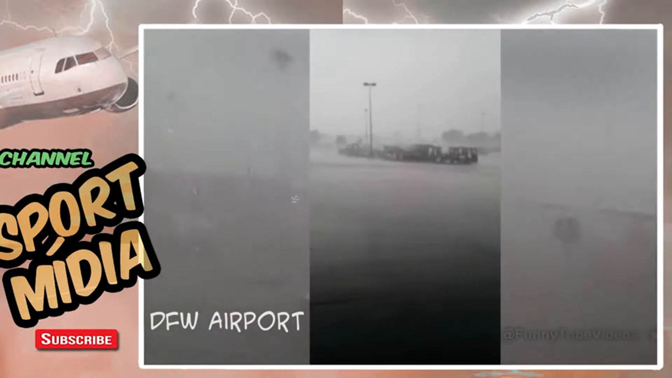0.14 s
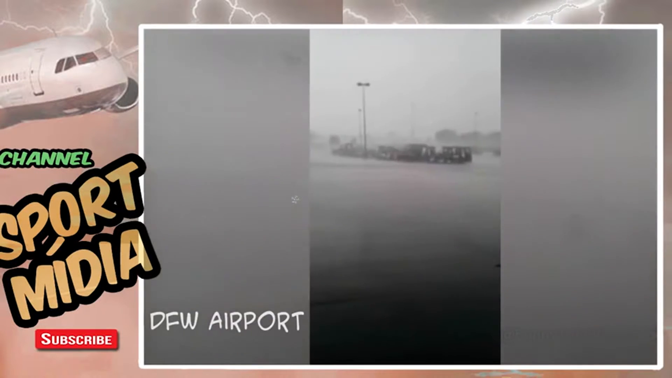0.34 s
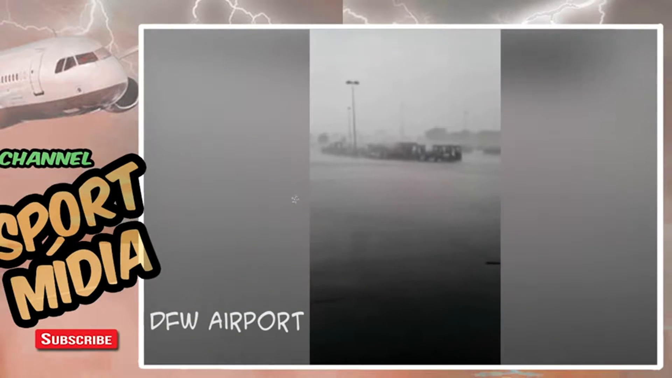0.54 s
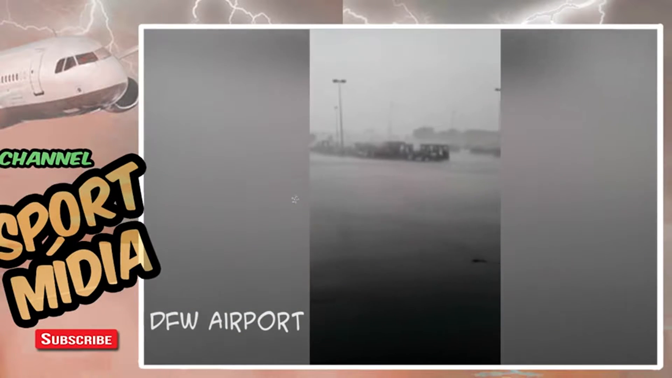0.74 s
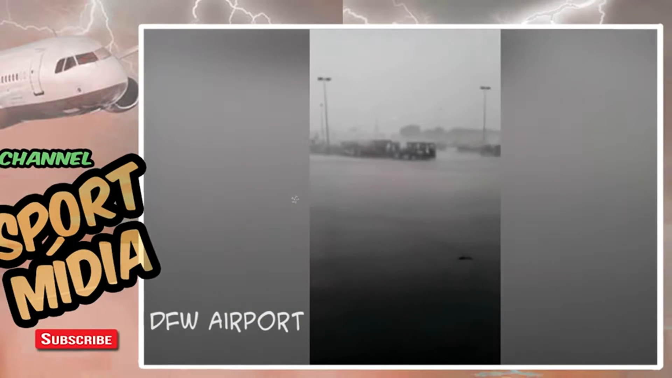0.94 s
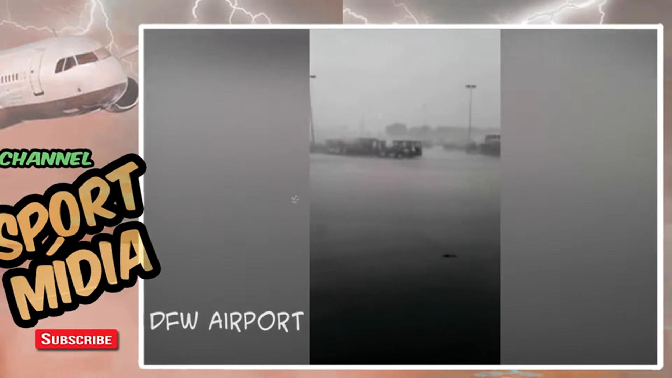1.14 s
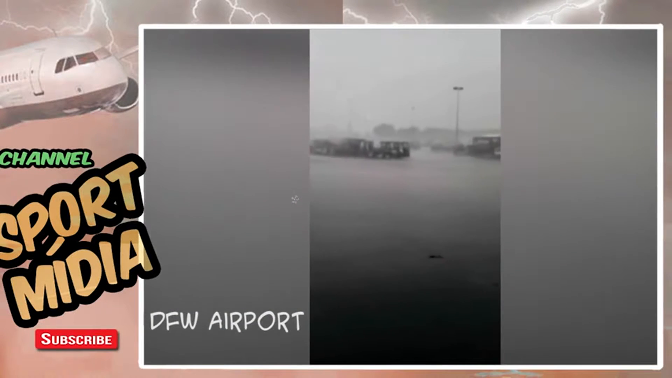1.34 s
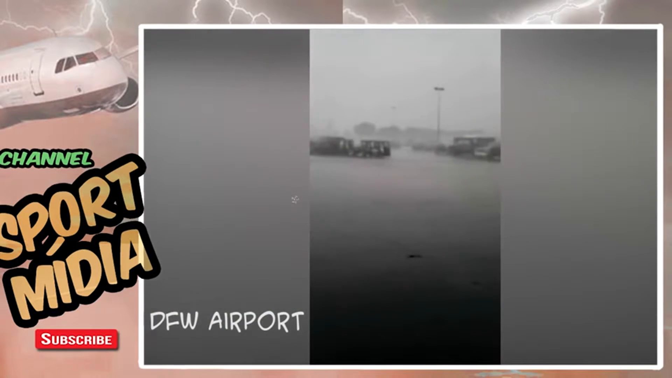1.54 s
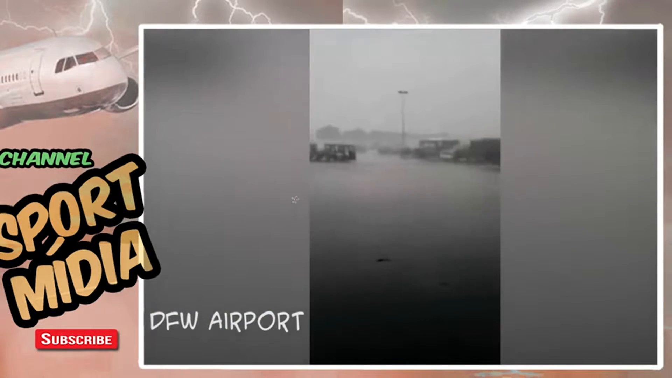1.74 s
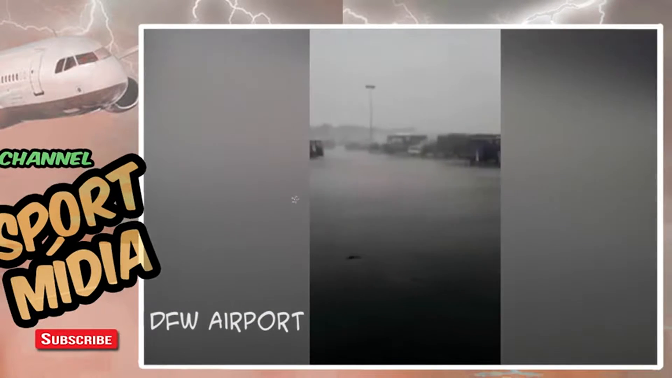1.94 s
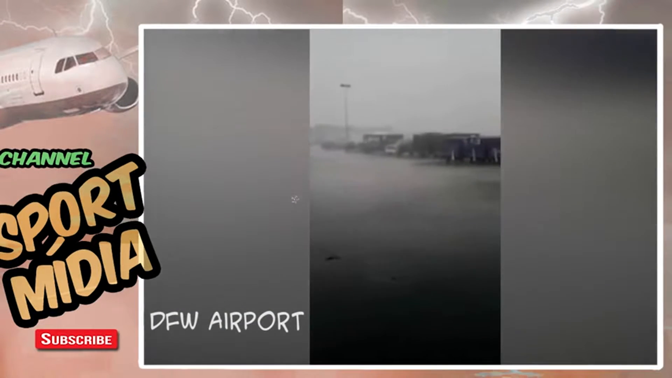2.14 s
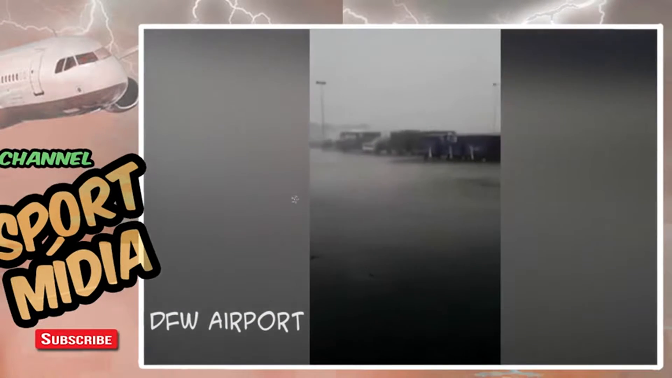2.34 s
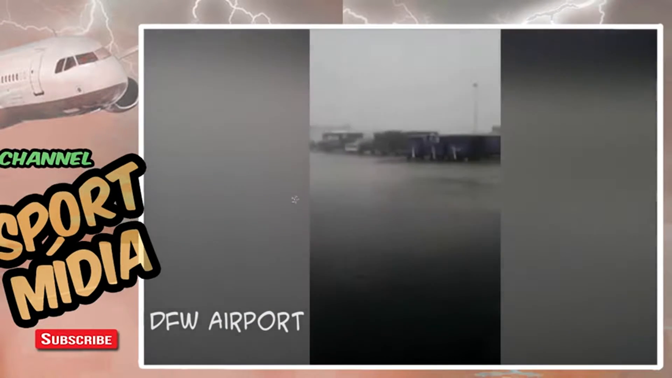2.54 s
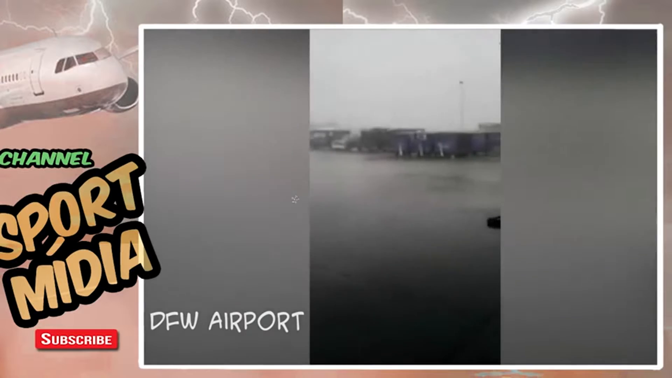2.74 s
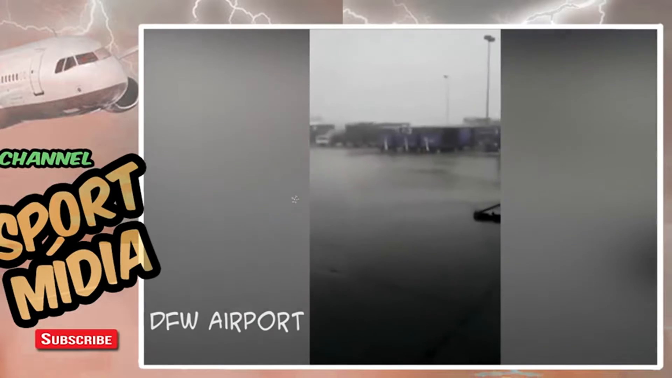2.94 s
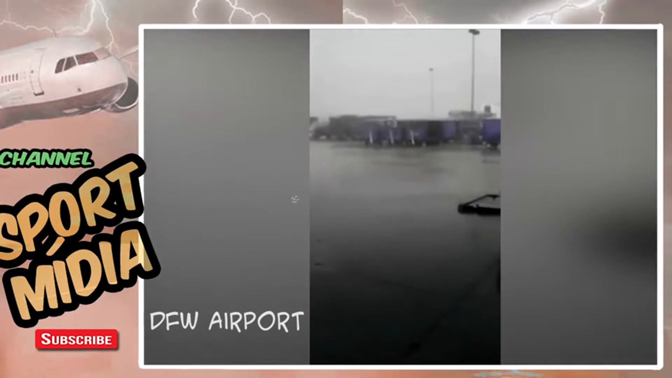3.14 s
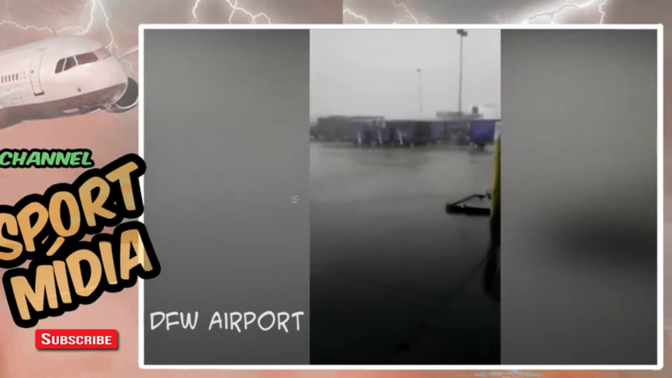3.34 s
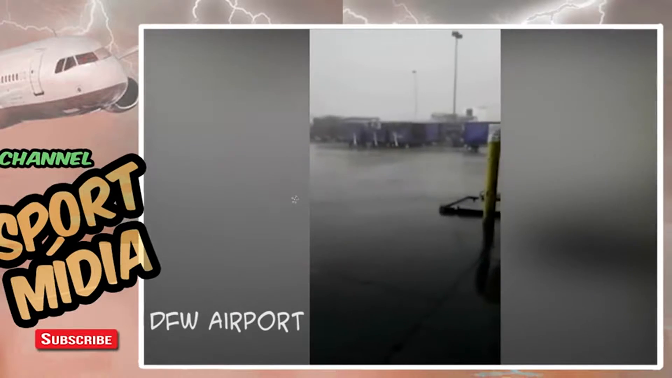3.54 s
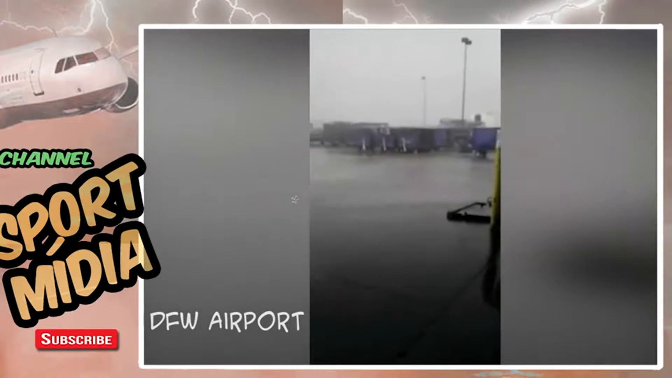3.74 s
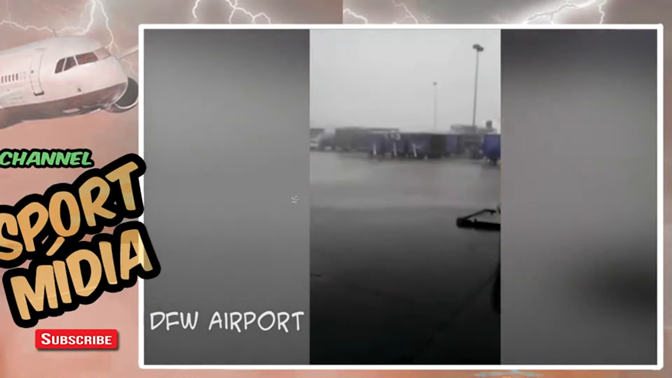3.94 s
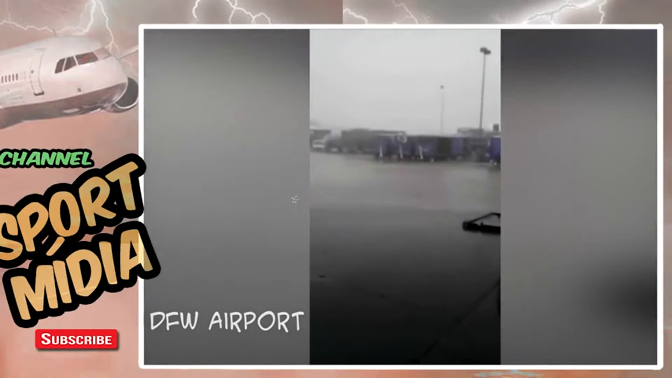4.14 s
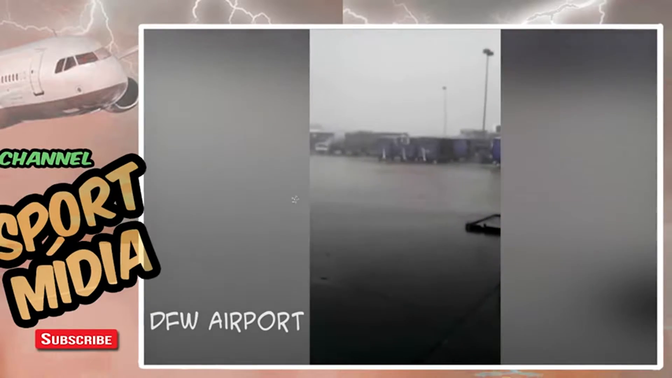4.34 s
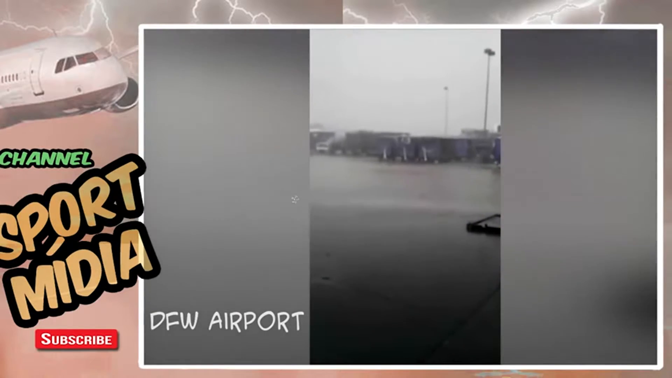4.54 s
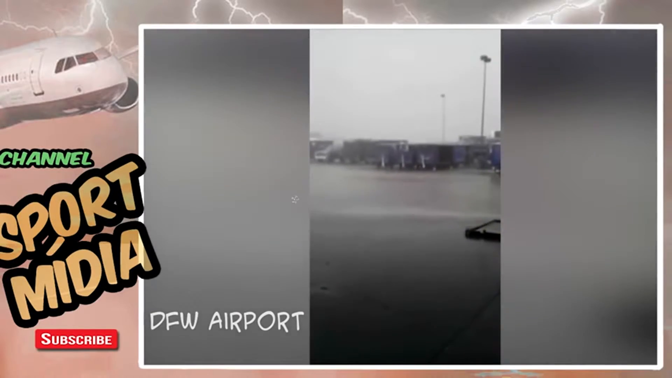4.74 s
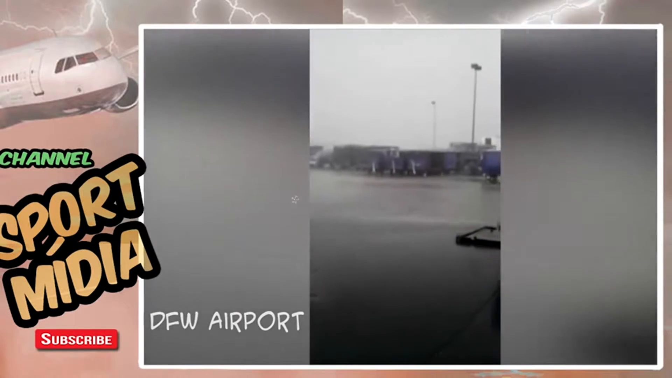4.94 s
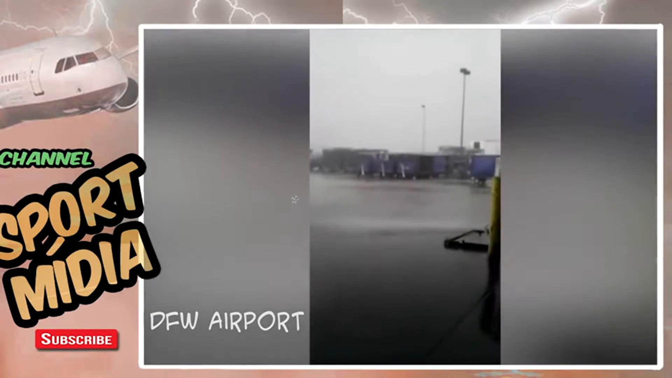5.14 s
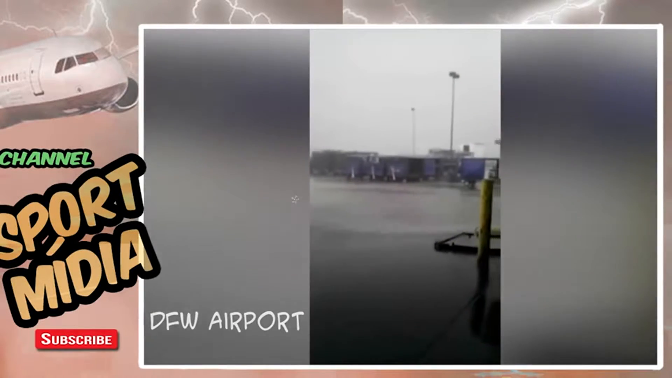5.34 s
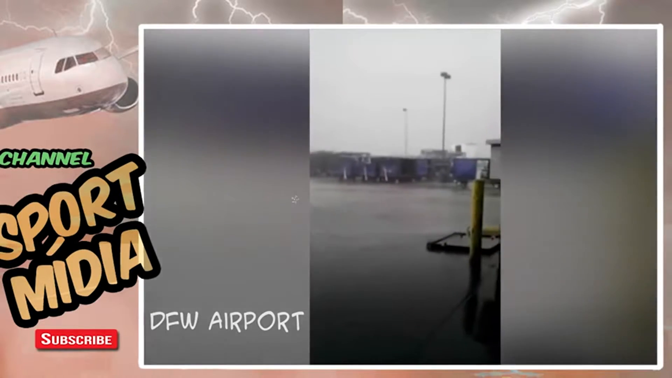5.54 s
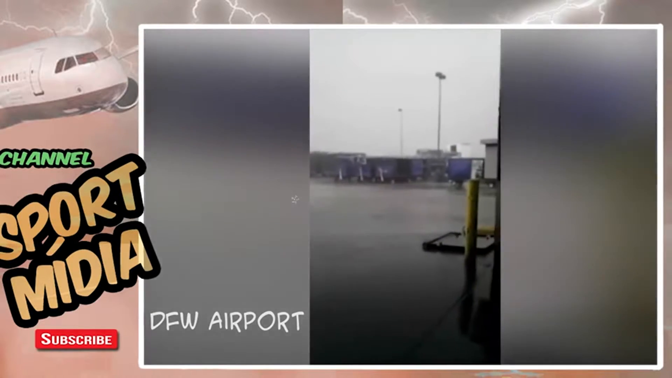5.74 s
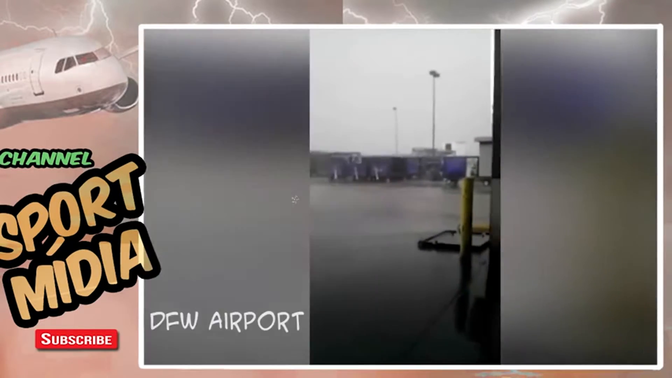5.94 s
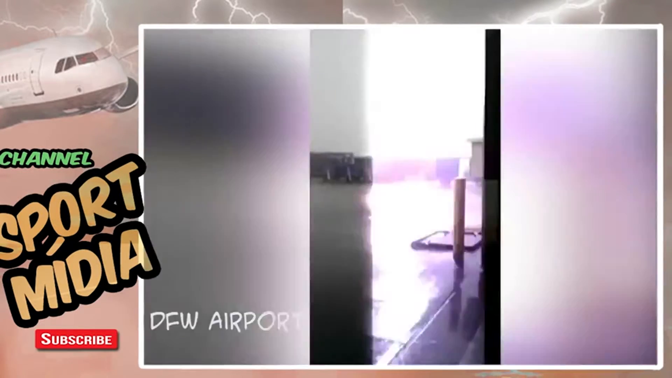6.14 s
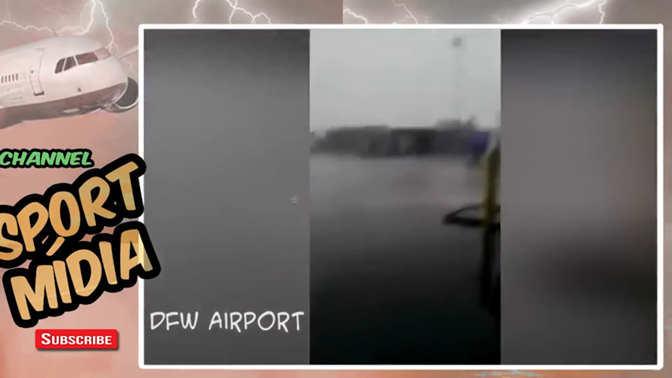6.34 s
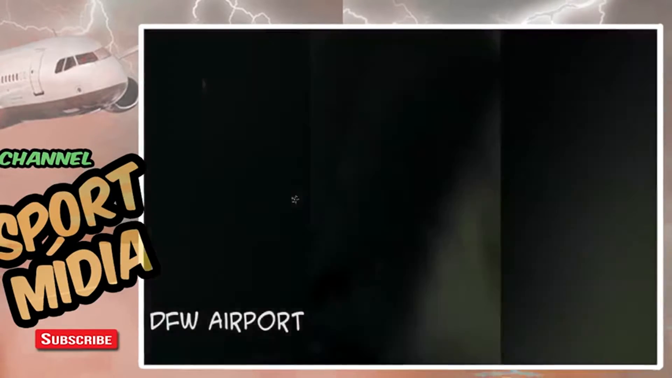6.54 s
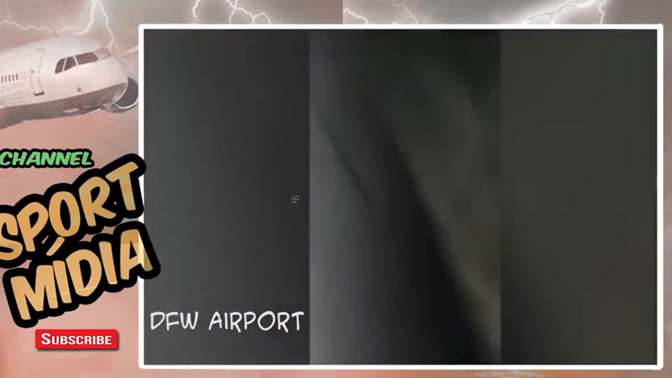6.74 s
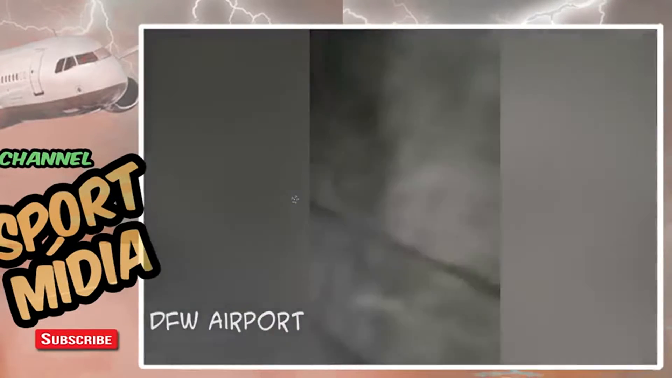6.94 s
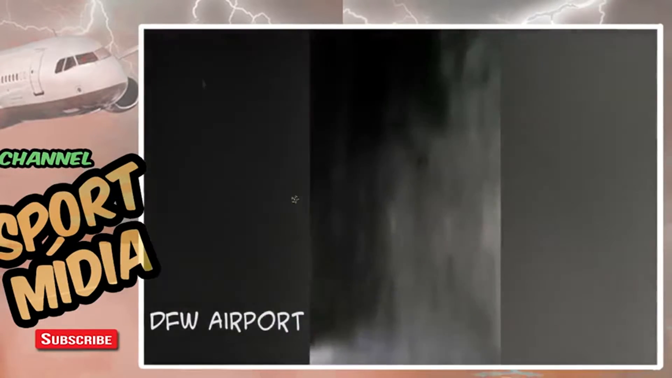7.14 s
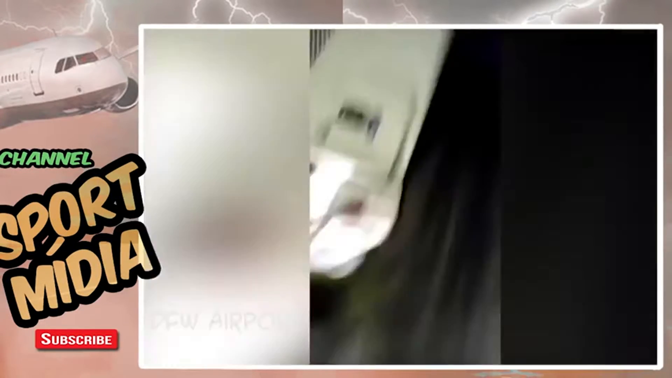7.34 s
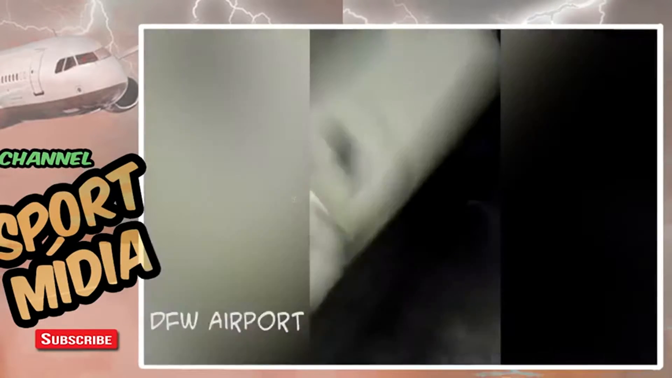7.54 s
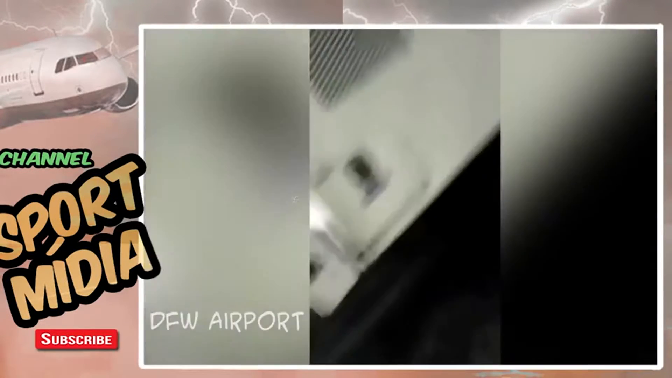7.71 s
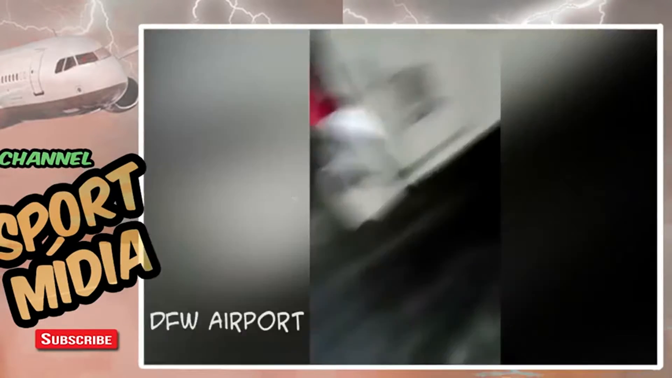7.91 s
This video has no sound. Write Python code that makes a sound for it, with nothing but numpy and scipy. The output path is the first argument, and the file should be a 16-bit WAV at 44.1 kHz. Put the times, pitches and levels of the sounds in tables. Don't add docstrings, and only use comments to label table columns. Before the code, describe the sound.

Steady rain hisses under gusts that buffet the microphone, then very close lightning cracks violently and an overloaded boom rolls away into dull thunder.

```python
import sys
import numpy as np
from scipy import signal
from scipy.fft import rfft, irfft, next_fast_len
from scipy.io import wavfile
from scipy.ndimage import uniform_filter1d

SR = 44100
rng = np.random.default_rng(int(sys.argv[2]) if len(sys.argv) > 2 else 0)


def gain_from_decibels(decibels):
    exponent = np.asarray(decibels, float) / 20
    return 10 ** exponent


def transcribe(u):
    v = np.clip(np.atleast_2d(u).T, -1, 1)
    q = np.round(v * 32767).astype(np.int16)
    wavfile.write(sys.argv[1], SR, q)


N = 355970
T = np.arange(N) / SR
SLOW = T[::32]
CUT_S = 0.06


# [onset t/s, peak level/dB, decay t60/s]
CRACKS = [
    (6.112, -14.5, 0.13),
    (6.1345, -4, 0.073),
    (6.146, 6, 0.043),
    (6.151, 1.5, 0.035),
    (6.161, -8, 0.32),
    (6.188, 0, 0.051),
    (6.2, 1, .06),
    (6.213, 0, 0.16),
    (6.8277, -5, .08),
]
# [f/Hz, level/dB per Hz]
CRACK_COLOUR = [(60, -65), (130, -30), (300, -2.5), (1200, -10.5), (2300, -11.5), (3200, -5), (4200, -9.5),
                (6300, -5.5), (8500, -9.5), (12400, -18), (14000, -27)]


def cracks():
    t = T[::8]
    shape = 0
    for s, db, t60 in CRACKS:
        decay = gain_from_decibels(db - 60 * np.maximum(t - s, 0) / t60)
        shape = shape + decay * np.clip((t - s) / 0.0034, 0, 1)
    shocks = patter(rate=4100, spread_db=-1.0, share=0.3)
    tear = unit(irfft(colour(shocks, CRACK_COLOUR)[0])[:N])
    return gain_from_decibels(-6.5) * np.interp(T, t, shape) * tear


# [t/s, level/dB, extra distance of the part of the channel heard/m]
ROLL = [
    (6.232, 6.5, 0),
    (6.32, 6, 2),
    (6.45, 2, 10),
    (6.81, -5.5, 1.5),
    (6.85, -1, 0),
    (7.15, -3.5, 31),
    (7.4, -4, 124),
    (7.6, -6, 182),
    (8.07, -6, 297),
]
# [f/Hz, level/dB per Hz]
ROLL_COLOUR = [(18, -63), (30, -39), (117, -9), (222, -1), (371, -3.5), (411, -8.5), (467, -6), (722, -9),
               (982, -12.5), (1090, -11.5), (3360, -19.5), (8470, -19), (13800, -23)]
# [peak t/s, level/dB, rise/s, fall/s], rise and fall over 10 dB
BOOMS = [
    (6.25, 5, .3, 0.53),
    (6.6, -2, .3, 0.27),
    (6.81, 0, 0.27, 0.022),
    (6.99, -7, 0.11, 0.062),
    (7.25, -11.5, 0.15, 0.31),
    (7.7, -21, 0.59, 0.61),
    (8.02, -11, 0.36, .2),
]
# [peak t/s, level/dB, rise/s, fall/s]
RIPS = [
    (6.3, -1, 0.071, 0.045),
    (6.65, 2, 0.091, 0.19),
    (6.85, -5, 0.039, 0.085),
]
# [f/Hz where booms are full, f/Hz where they vanish]
BOOM_TOP_HZ = [260, 940]
# [f/Hz where rips begin, f/Hz where they are full]
RIP_FROM_HZ = [570, 22000]
# [f/Hz, loss/dB per 100 m]
TREBLE_LOSS = [(950, 0), (3000, 2), (6900, 4), (8200, 7), (9700, 20), (11500, 21), (13800, 41)]


def roll():
    strike_s = 6.226
    level_db, metres = curve(ROLL)
    boom_db, rip = swells(BOOMS, -25), gain_from_decibels(swells(RIPS, -35))
    lumps = walk(rate=18)
    out, size = np.zeros(N), 2 * SR
    shocks = patter(rate=1500, spread_db=1.5, share=0.26, size=size)
    for hz, band in bands(shocks, ROLL_COLOUR, count=4):
        low, high = along(hz, BOOM_TOP_HZ, [1, 0]), along(hz, RIP_FROM_HZ, [0, 1])
        boom_weight = along(hz, [90, 220], [1.3, 1]) * low
        body = gain_from_decibels(boom_weight * boom_db + (1 - low) * level_db - 2.4 * high)
        loss_db = along(hz, *np.transpose(TREBLE_LOSS)) * metres / 100
        band_db = 20 * np.log10(body + 0.53 * high * rip)
        band_db = band_db + 0.4 * lumps + 0.9 * walk(rate=25) - loss_db
        out[-size:] += band * gain_of(band_db)[-size:]
    return out * gain_from_decibels(-8.0) * np.clip((T - strike_s) / 0.0019, 0, 1)


# [t/s, level/dB, spray blown past the shelter/dB]
RAIN = [(0.07, -33, -0.5), (0.98, -33.5, -1), (1.04, -36.5, -1.5), (1.28, -36, -2.5), (1.43, -34.5, -2),
        (2.3, -35, -1), (2.71, -35.5, 1), (3.06, -35.5, 0.5), (3.45, -36, 1), (3.8, -34.5, -1),
        (4.05, -36, -.5), (4.8, -36, -0.5), (5.13, -36, 0), (5.6, -36.5, -1), (6.03, -34.5, -0.5),
        (6.1, -32, -1.5)]
# [f/Hz, level/dB per Hz]
RAIN_COLOUR = [(30, -43), (80, -14), (160, -4), (300, -4.5), (620, -2), (1100, -2), (1700, -5), (2100, -8),
               (4000, -7), (8300, -7), (9500, -14), (11000, -18), (13000, -22), (14000, -28)]


def rain():
    mist_per_spray = 1.8
    level_db, spray_db = curve(RAIN)
    sheets = walk(rate=6) + 5 * np.exp(-((SLOW - 3.36) / 0.035) ** 2)
    drops = patter(rate=2500, spread_db=4.0, share=0.1)
    out = 0
    for hz, band in bands(drops, RAIN_COLOUR):
        high, top = along(hz, [1400, 2600], [0, 1]), along(hz, [8000, 12000], [0, 1])
        band_db = (high - mist_per_spray * top) * spray_db + 0.1 * top
        band_db = band_db + 0.58 * high * sheets + 0.6 * walk(rate=10)
        out = out + band * gain_of(band_db)
    return out * gain_of(level_db + duck_db() + 2.0)


# [peak t/s, level/dB, rise/s, fall/s, share of small tight eddies/dB]
GUST = [(.07, -31.5, .01, 0.04, 2), (.3, -31.5, .07, .4, -2), (.56, -27, 0.22, .22, -3),
        (.94, -19.5, 0.084, 0.3, -3), (1.08, -19.5, 0.16, 0.088, -1), (1.24, -20.5, 0.058, .035, 2),
        (1.35, -23.5, 0.064, 0.16, 1), (1.6, -30.5, 0.22, 1, 3), (2.065, -17, 0.028, 0.015, -2.5),
        (2.2, -26.5, 0.31, 0.2, -5), (2.78, -23, 0.28, 0.27, 3.5), (2.95, -28, 0.32, 0.51, -7),
        (3.63, -35, .02, 0.018, -8), (4.03, -37, 0.2, 0.08, -1), (4.369, -22, 0.015, 0.018, 1.5),
        (4.49, -30, 0.028, 0.012, -8), (4.74, -32.5, 0.13, .3, -8), (4.95, -35, 0.14, 0.34, 0.5),
        (5.35, -36.5, 0.23, 0.37, 2), (5.72, -39.5, .12, 0.16, 6.5), (5.91, -36, 0.026, .05, 2),
        (6.08, -38, 0.048, 0.55, -2)]
# [f/Hz, level/dB per Hz]
GUST_COLOUR = [(18, -68), (30, -45), (91, -14.5), (152, -2), (178, -1), (226, -1.5), (352, -6),
               (524, -25.5), (579, -19), (900, -28), (1170, -54), (1980, -120)]
# [t/s, peak level/dB, f/Hz, length/s]
THUMPS = [(0.415, -2, 328, 0.0041), (0.535, -6, 185, 0.014), (0.997, -8, 159, 0.0081),
          (1.069, -1, 166, 0.014), (1.124, -10, 180, 0.013), (1.302, -5.5, 172, 0.019),
          (1.34, -4, 304, 0.013), (1.564, -8.5, 232, 0.013), (2.05, -20, 103, 0.012),
          (2.05, -11, 184, 0.013), (2.111, -10, 229, 0.009), (2.149, -15, 194, 0.011),
          (3.281, -11, 159, 0.014), (3.314, -16, 127, 0.023), (4.357, -11, 188, 0.016),
          (4.372, -5.5, 155, 0.016)]


def wind():
    lull_db = -48
    gust_db = swells([row[:4] for row in GUST], lull_db)
    tight = [(s, db + share_db, rise, fall) for s, db, rise, fall, share_db in GUST]
    tight_db = swells(tight, lull_db) - gust_db
    out = 0
    for hz, band in bands(rng.standard_normal(N), GUST_COLOUR):
        if hz > 1500:
            break
        tilt = along(hz, [150, 300], [-0.5, 0.8])
        out = out + band * gain_of(tilt * tight_db + 0.78 * walk(rate=22))
    out = out * gain_of(gust_db + duck_db() + 0.61 * walk(rate=58) - 4.5)
    for s, db, hz, length in THUMPS:
        near = slice(int((s - length) * SR), int((s + 2 * length) * SR))
        t = T[near] - s - length / 2
        envelope = np.exp(-(2 * t / length) ** 2)
        out[near] += gain_from_decibels(db - 10.5) * envelope * np.sin(2 * np.pi * hz * t)
    return out


# [f/Hz, level/dB per Hz]
BEFORE = [(12, -18), (30, 2), (60, -4.5), (150, -20), (442, -26.5), (604, -33), (1370, -38), (1900, -55),
          (2150, -100), (4620, -120)]


def far_rumble():
    rumble = irfft(colour(rng.standard_normal(N), BEFORE)[0])[:N]
    rumble = rumble / np.std(rumble[T < CUT_S])
    return gain_from_decibels(-15) * rumble * np.clip((CUT_S - T) / 0.0007 + 1, 0, 1)


# [t/s, gain/dB]
RAIN_DUCK = [
    (6.14, 7.5),
    (6.25, -16),
    (7.2, -28),
    (7.85, -20),
    (8.07, -5.5),
]


def duck_db():
    return curve(RAIN_DUCK)[0]


def curve(table):
    s, *columns = np.transpose(table)
    return [np.interp(SLOW, s, c) for c in columns]


def along(hz, points_hz, values):
    return np.interp(np.log(np.maximum(hz, 1)), np.log(points_hz), values)


def unit(x):
    return x / np.sqrt(np.mean(x ** 2))


def gain_of(db):
    return np.interp(T, SLOW, gain_from_decibels(db))


def swells(table, floor_db):
    power = gain_from_decibels(2 * floor_db)
    for s, db, rise, fall in table:
        slope = np.maximum((s - SLOW) / rise, (SLOW - s) / fall)
        power = power + gain_from_decibels(2 * db - 20 * slope)
    return 10 * np.log10(power)


def walk(rate):
    k = int(len(SLOW) / T[-1] / rate)
    held = np.repeat(rng.standard_normal(len(SLOW) // k + 1), k)
    return uniform_filter1d(uniform_filter1d(held, k), k)[:len(SLOW)]


def patter(rate, spread_db, share, size=N):
    strikes = rng.random(size) < rate / SR
    force = gain_from_decibels(spread_db * np.minimum(rng.exponential(size=size), 3.0))
    hits = strikes * force * rng.standard_normal(size)
    return np.sqrt(share) * unit(hits) + np.sqrt(1 - share) * rng.standard_normal(size)


def colour(x, table):
    size = next_fast_len(len(x))
    hz = np.arange(size // 2 + 1) * SR / size
    return rfft(x, size) * gain_from_decibels(along(hz, *np.transpose(table))), hz


def bands(x, table, count=2):
    spectrum, hz = colour(x, table)
    octave = np.log2(np.maximum(hz, 1))
    whole = np.std(irfft(spectrum))
    for centre in np.arange(5, 14.1, 1 / count):
        window = np.clip(1 - count * abs(octave - centre), 0, 1)
        yield 2 ** centre, irfft(spectrum * window)[:len(x)] / whole


def scene():
    mono = rain() + wind() + cracks() + roll()
    return np.array([mono, mono])


# [f/Hz, early tap gain, late tap gain, phase lead/rad, share left coherent 0-1]
SPREAD = [(40, .25, 0, 0, .4), (90, .9, 0, 0, .95), (430, .88, 0, .43, .97), (1000, .82, .03, .25, .9),
          (1400, .82, .05, .17, .72), (2600, .84, .12, .1, .4), (5500, .62, .52, 0, .33),
          (7700, .62, .64, 0, .4), (8400, .22, .26, 0, .2), (10000, .32, .32, 0, .2),
          (13000, .42, .42, 0, .2)]


def spread(mid):
    early_delay, late_delay = 71.5, 178
    hz, early, late, lead, intact = np.transpose(SPREAD)
    f, _, z = signal.stft(mid, SR, nperseg=1024)
    kept = np.clip(along(f, hz, intact), 0, 1)[:, None]
    scramble = np.exp(2j * np.pi * rng.random(z.shape))
    z = z * (np.sqrt(kept) + 1.45 * np.sqrt(1 - kept) * scramble)
    worn = signal.istft(z, SR, nperseg=1024)[1][:N]
    size = next_fast_len(N)
    turn = 2j * np.pi * np.arange(size // 2 + 1) / size
    f = turn.imag * SR / (2 * np.pi)
    taps = along(f, hz, early) * np.exp(1j * along(f, hz, lead) - turn * early_delay)
    taps = taps - along(f, hz, late) * np.exp(-turn * late_delay)
    return irfft(rfft(worn, size) * taps, size)[:N]


# [f/Hz, level/dB]
LINE_STEP = [(1000, -89.5), (5000, -63.5), (8000, -63), (9500, -58), (11500, -58.5), (13500, -57.5)]


def thin(x):
    f, s, z = signal.stft(x, SR, window="cosine", nperseg=2048)
    whim = uniform_filter1d(rng.standard_normal((65, len(s))), size=3)
    whim = np.repeat(whim, 16, axis=0)[:len(f)]
    step = gain_from_decibels(along(f, *np.transpose(LINE_STEP))[:, None] + 4.0 * whim)
    size = np.abs(z) / step + 1e-9
    z = z * np.floor(size + 0.4) / size
    return signal.istft(z, SR, window="cosine", nperseg=2048)[1][..., :N]


def band_limit(x):
    return signal.sosfilt(signal.butter(12, 13940, fs=SR, output="sos"), x)


def record(dry):
    mid = 0.95 * np.tanh(1.15 * dry[0])
    mid, side = thin(np.array([mid, spread(mid)])) * (T > CUT_S)
    mid = mid + far_rumble()
    mix = np.clip(np.array([mid + side, mid - side]), -1, 1)
    return band_limit(mix)


dry = scene()
out = record(dry)
transcribe(out)
```